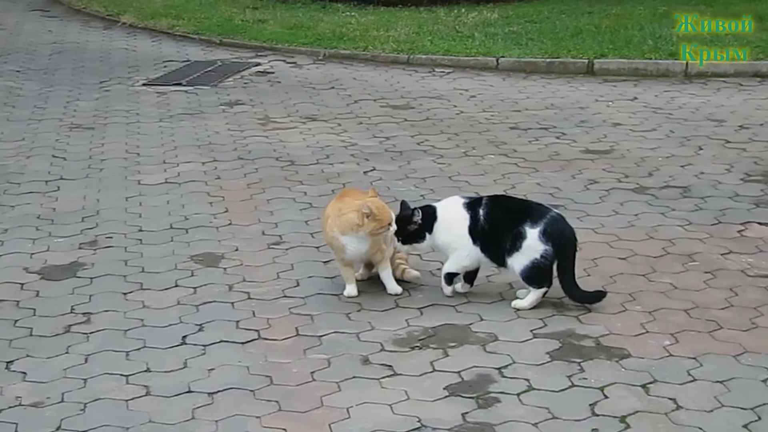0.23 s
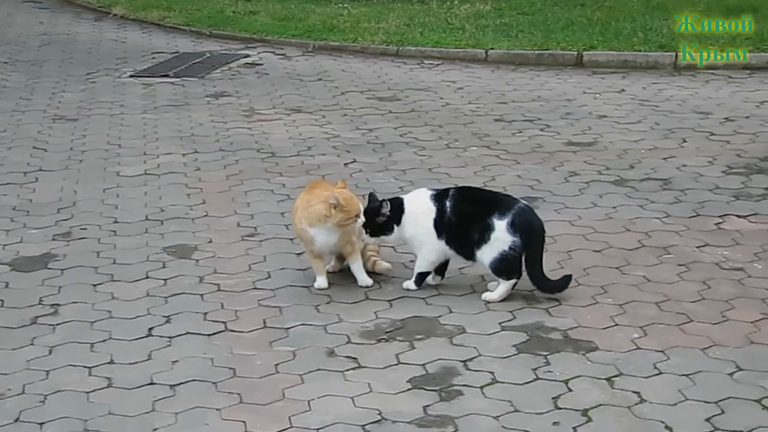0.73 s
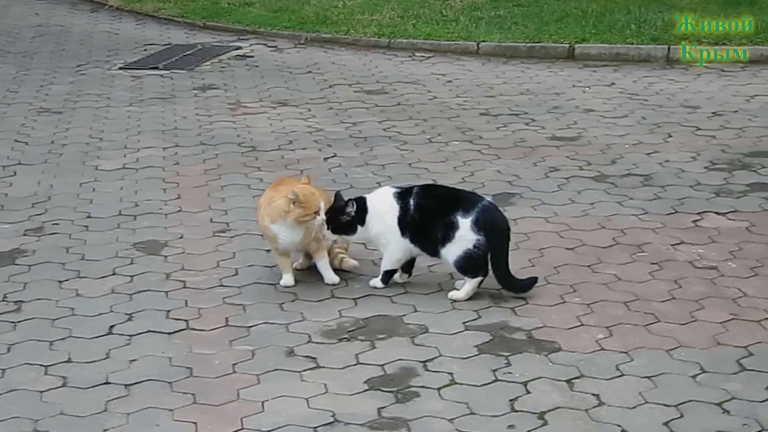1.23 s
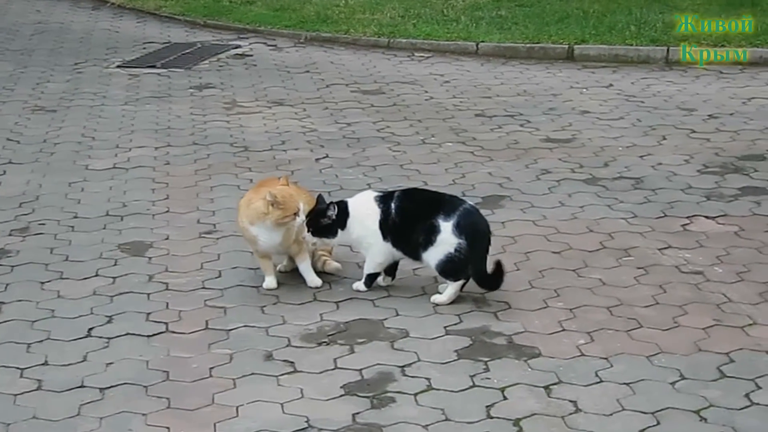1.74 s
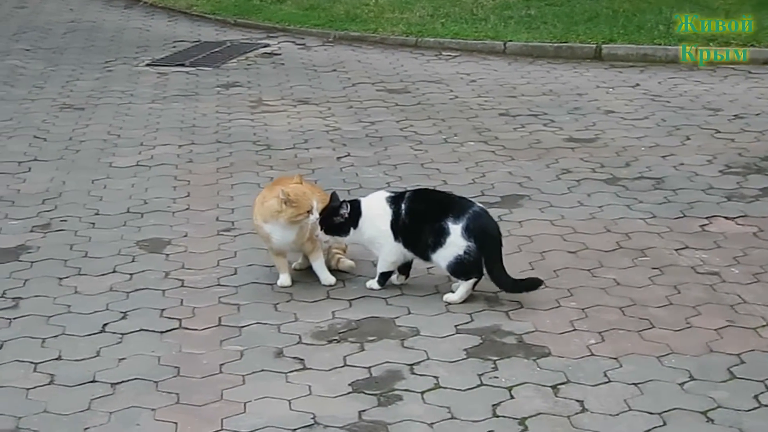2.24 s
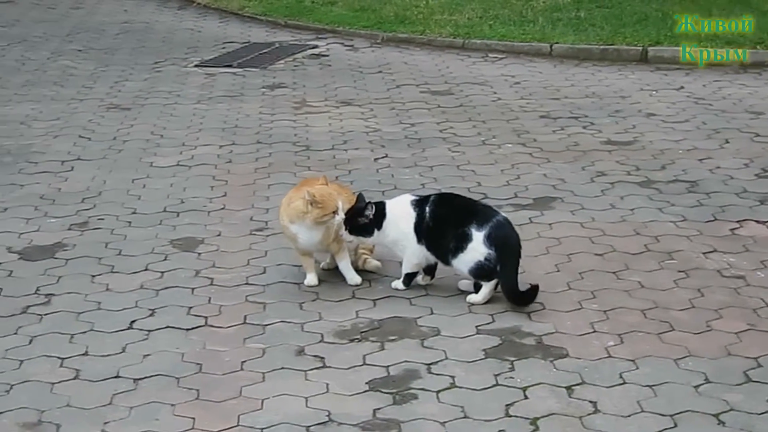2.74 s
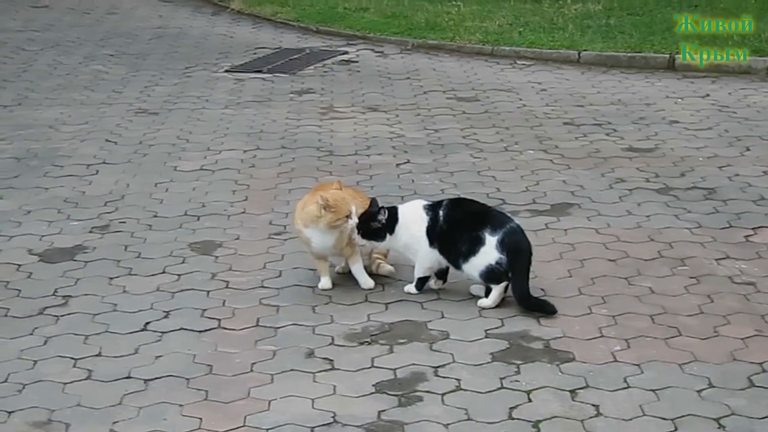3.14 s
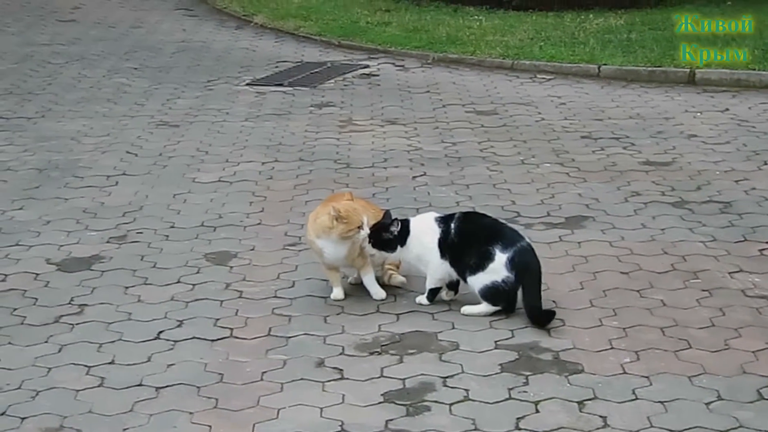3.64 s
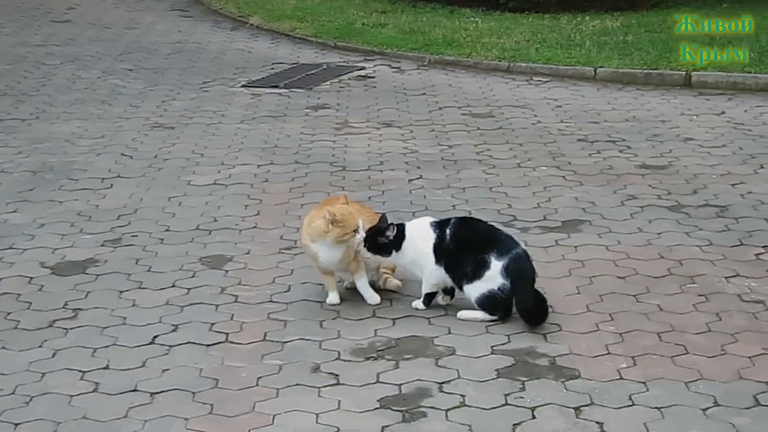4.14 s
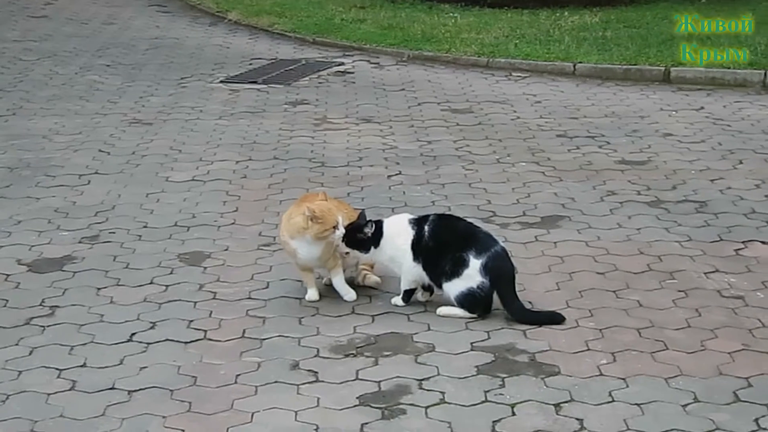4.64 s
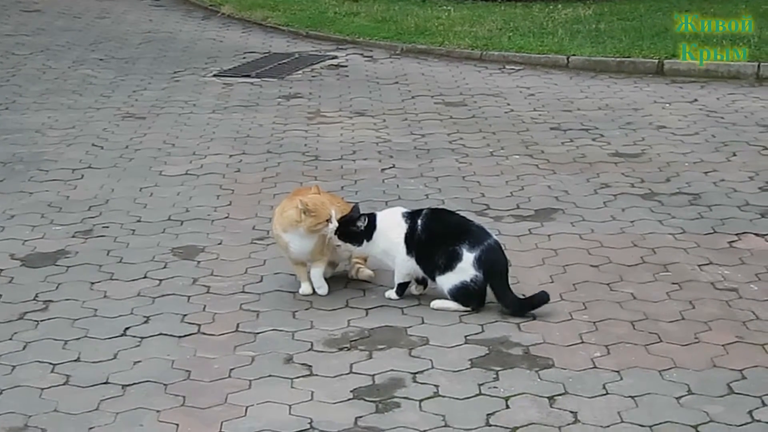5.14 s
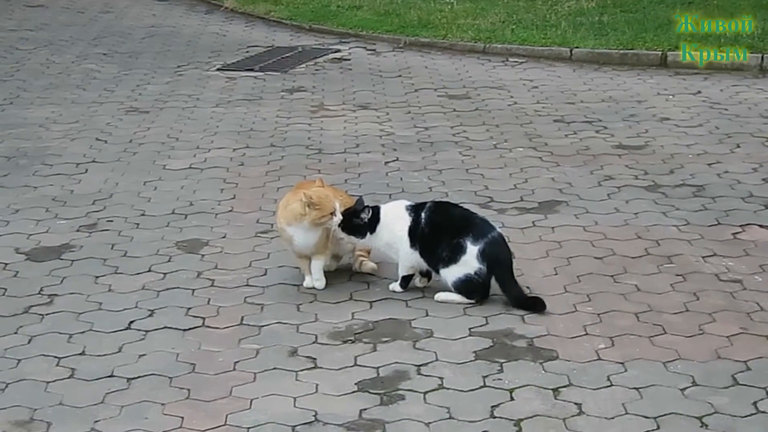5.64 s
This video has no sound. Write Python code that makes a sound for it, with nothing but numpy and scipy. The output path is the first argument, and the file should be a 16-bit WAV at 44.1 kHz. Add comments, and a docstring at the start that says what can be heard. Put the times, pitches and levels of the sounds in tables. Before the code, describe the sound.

A steady outdoor bed of low rumble and soft hiss, wide in stereo, lasts the whole six seconds. From 0 to 1.2 s a cat gives a low, slightly rough closed-mouth moan, a bit right of centre, steady at first and then sinking. At about 1.1 s the other cat starts a long yowl near the centre, with a small sharp tick on the right. It leaps up with a raspy edge, peaks around 1.3 s, throbs gently near 1.9 s, slides down until about 3 s, then grows louder and rises to a brighter, open cry near 3.9 s before stopping at 4.1 s. The tone is nasal, almost whistled. A faint diffuse echo fades in the lull. At 4.65 s a second, hoarser yowl swoops up quietly, strengthens by 5 s, dips, and holds to the end. Four short clicks fall between 5.6 and 5.83 s, the second strongest and leftward.

```python
"""Two cats face each other on a paved yard, over a steady rumble and hiss made of filtered noise.
One moans low with its mouth closed; as it ends, the other starts a long yowl, close to a sharp click.
After a short lull a second yowl rises, with four more clicks near its end. The calls are stacks of harmonics;
the mouth resonance sits near the second one, so the yowls are almost whistles. Clicks are short ringing tones.
Distant walls and trees answer the calls with a faint echo of fading noise."""
import sys
import numpy as np
from scipy import signal
from scipy.io import wavfile

SR = 44100
rng = np.random.default_rng(int(sys.argv[2]) if len(sys.argv) > 2 else 0)


def master(y):
    """Save y as 16-bit WAV."""
    cut = np.clip(np.atleast_2d(y).T, -1, 1)
    pcm = np.round(cut * 32767)  # scale
    wavfile.write(sys.argv[1], SR, pcm.astype(np.int16))


N = 260190

# Outdoor background noise, before its overall level is set: f/Hz, relative level per Hz/dB
AIR_SPECTRUM = [(25, -26), (45, 4), (72, -0.5), (110, 0.5), (190, 1), (350, -5.5), (700, -5.5),
                (1050, -9.5), (1400, -11.5), (2500, -15), (4500, -18.5), (8000, -22.5), (13000, -32),
                (15500, -17)]
# How alike the background is at the two ears: f/Hz, left-right correlation (1 = the same)
EAR_LIKENESS = [(30, 0.71), (70, 0.95), (170, 0.13), (350, 0.057), (700, 0.14), (1500, 0.36), (3000, 0.66),
                (6000, 0.51), (11000, .05)]
# Narrow bands that stand out of the background: f/Hz, width/Hz, level/dB
HUM_BANDS = [(74.2, 13, -45), (1069, 62, -44.5)]
# Clicks: t/s, hollow knock/dB, snap/dB, bright tick/dB, left over right/dB
CLICK_TIMES = [(1.1435, -42, -23, -17.5, -18.5), (5.608, -53, -25, -43, -6), (5.666, -11.5, -3.5, -23, 7.5),
               (5.748, -17.5, -27, -40, 1), (5.829, -19, -44, -32, 0)]
# What the clicks ring with, three modes each for knock, snap and tick: f/Hz, level/dB, time to fall 60 dB/s
RINGING_MODES = [(1096, 7.5, 0.01), (1269, 7, 0.0088), (1880, -10.5, 0.02), (2950, -6.5, 0.011),
                 (3736, -6.5, 0.016), (4450, -6, 0.0039), (7260, 4, 0.0015), (9070, -8.5, 0.0088),
                 (10400, -4, 0.0051)]
# The moan, its mouth kept closed: t/s, pitch/Hz, effort/dB
MOAN_CURVE = [(0, 481.7, -24), (.2, 474, -19.5), (0.459, 484.4, -14.5), (.78, 481.6, -16),
              (0.921, 446.6, -24), (1.09, 400.6, -19), (1.19, 389, -20.5)]
# The two yowls: t/s, pitch/Hz, effort/dB, mouth resonance/Hz
FIRST_YOWL_CURVE = [(1.075, 240, -30, 800), (1.11, 318, -22, 870), (1.15, 426, -9, 990),
                    (1.2, 493, -12, 1110), (1.32, 533, -10, 1250), (1.47, 516, -6, 1190),
                    (1.61, 489, -11, 1020), (1.8, 462, -8.5, 950), (2.04, 453, -8, 915),
                    (2.12, 441, -12, 860), (2.19, 431.5, -9.5, 850), (2.3, 421, -10.5, 865),
                    (2.346, 428, -13, 880), (2.41, 418, -9, 865), (2.56, 420.5, -9, 880),
                    (2.74, 396, -11, 795), (2.91, 374.5, -10.3, 785), (3.05, 374, -6, 821),
                    (3.21, 375.5, -5, 900), (3.47, 401, -5, 912), (3.62, 390.5, -4.5, 859),
                    (3.75, 427, -4, 1047), (3.87, 466, -4.5, 1187), (3.98, 462, -6, 1114),
                    (4.095, 436, -7, 1020)]
SECOND_YOWL_CURVE = [(4.65, 354.5, -44, 1090), (4.71, 435, -22, 1040), (4.77, 530.5, -22, 1230),
                     (4.86, 531, -18, 1285), (4.995, 509.7, -8.5, 1321), (5.01, 539, -10, 1324),
                     (5.12, 492.7, -12.5, 1051), (5.21, 477, -17.5, 1051), (5.31, 474.4, -16.5, 945),
                     (5.52, 463.2, -10.5, 921), (5.8, 473.2, -12, 918), (5.95, 466.4, -9, 910)]
# Throat resonances that shape the upper harmonics: f/Hz, width/Hz, level/dB
FIRST_THROAT_MODES = [(1670, 180, -2), (2084, 143, 0.5), (2340, 41, -6), (6800, 170, -17),
                      (7580, 210, -11.5), (11000, 59, -22), (12200, 200, -20)]
SECOND_THROAT_MODES = [(2030, 250, -9), (2360, 47, 1), (2634, 130, -2.5), (3090, 110, -10),
                       (4230, 280, -21), (6570, 54, -10), (13000, 724, -29)]

AIR_DB = -33   # background level, as rms of the two channels' average
CUTOFF_HZ = 15300   # nothing much is heard above this
YARD_T60_S, ECHO_BUILD_S = 0.69, 0.38   # echo: time to fall 60 dB, length of the rising ramp
ATTACK_S, RELEASE_S = 0.0063, 0.013   # fades of every call
CLOSED_HZ, HALF_OPEN_HZ = 680, 1004   # the mouth resonance rises as the jaw opens
MOUTH_Q, MOUTH_STEEPNESS = 7.65, 0.85   # sharpness of the mouth resonance and steepness of its skirts
PRESSED_AFTER_S, PRESSED_S = 0.2, 0.11   # a moment early in the call when the overtones change level
UNSETTLED_DB = -1   # overtones are weaker until the folds lock
QUAVER_AT_S, QUAVER_SPREAD_S, QUAVER_HZ, QUAVER_DB = 1.893, 0.29, 6.8, 1.5   # throb in the first yowl
MID_PITCH_HZ = 475
LOW_DB_PER_OCTAVE, UPPER_DB_PER_OCTAVE = 14.5, 15   # fundamental and overtones grow with the pitch
SETTLE_S, RASP_PER_OCTAVE = 0.081, 0.3   # early rasp clears, then returns as the mouth passes half open
WAVER_DB, FLICKER_DB = 0.47, 3.5   # unsteadiness of the whole voice and of single high harmonics


def from_db(db):
    """Decibels to gain."""
    return 10 ** (np.asarray(db) / 20)


def rms_one(x):
    """Scale to rms 1."""
    return x / np.sqrt(np.mean(x ** 2) + 1e-20)


def in_time(rows, t):
    """The columns of a curve, joined by straight lines, at the times t."""
    s, *columns = np.transpose(rows)
    return [np.interp(t, s, column) for column in columns]


def at_hz(points, hz):
    """Read a spectrum at hz, on a log-frequency axis."""
    points_hz, values = np.array(points).T
    return np.interp(np.log(hz), np.log(points_hz), values)


def panned(x, pan_db):
    """Place a mono sound by how much louder it is on the left than on the right."""
    return x * from_db([[pan_db / 2], [-pan_db / 2]])


def drift(rate_hz, size):
    """Slow random wandering of rms 1: noise sent twice through a simple low-pass."""
    r = np.exp(-2 * np.pi * rate_hz / SR)
    noise = rng.standard_normal(size + SR)
    slow = signal.lfilter([1], [1, -2 * r, r * r], noise)
    return rms_one(slow[SR:])   # the first second only warms up the filter


def narrow_noise(size, hz, width_hz):
    """Noise in one band around hz, rms 1."""
    edges = [max(hz - width_hz / 2, 15), hz + width_hz / 2]
    band = signal.butter(2, edges, "band", fs=SR, output="sos")
    noise = rng.standard_normal(size + SR)
    return rms_one(signal.sosfilt(band, noise)[SR:])


def air():
    """Far rumble and hiss: half-octave bands of noise, most alike at both ears in the bass."""
    out = 0
    edges = 22 * 2 ** np.arange(0, 9.6, .5)
    white = rng.standard_normal((2, 2, N))
    for k, (low, high) in enumerate(zip(edges, edges[1:])):
        band = signal.butter(2, [low, high], "band", fs=SR, output="sos")
        # neighbouring bands use different noise
        mid, side = signal.sosfilt(band, white[k % 2])
        hz = np.sqrt(low * high)
        alike = np.clip(at_hz(EAR_LIKENESS, hz), -1, 1)
        # the side part has opposite signs at the ears; more of it makes them less alike
        side_gain = np.sqrt((1 - alike) / (1 + alike + 1e-6))
        out = out + from_db(at_hz(AIR_SPECTRUM, hz)) * (mid + side_gain * side * [[1], [-1]])
    return out / np.sqrt(np.mean(out.mean(axis=0) ** 2))


def hum():
    """Narrow bands of noise that stand out of the background, equal at both ears."""
    return sum(from_db(db) * narrow_noise(N, hz, width) for hz, width, db in HUM_BANDS)


def ring(blow, hz, t60):
    """A unit blow sets a fading sine of starting height 1 ringing."""
    r = from_db(-60 / (t60 * SR))   # what is left after each sample
    w = 2 * np.pi * hz / SR
    return signal.lfilter([0, np.sin(w)], [1, -2 * r * np.cos(w), r * r], blow + 1e-18)


def clicks():
    """Each click rings the low, middle and high modes with strengths of its own."""
    out = np.zeros((2, N))
    blow = signal.unit_impulse(SR // 20)
    for s, *strengths_db, pan_db in CLICK_TIMES:
        sound = np.zeros(len(blow))
        for k, (hz, db, t60) in enumerate(RINGING_MODES):
            sign = (-1) ** k
            sound += sign * from_db(db + strengths_db[k // 3]) * ring(blow, hz, t60)
        start = round(s * SR)
        out[:, start:start + len(sound)] += panned(sound, pan_db)[:, :N - start]
    return out


def yard(x, thin_hz, dull_hz):
    """Middle-range scatter from distant walls and trees: it swells, then dies, differently at each ear."""
    t = np.arange(SR) / SR
    shape = np.minimum(t / ECHO_BUILD_S, 1) * from_db(-60 * t / YARD_T60_S)
    tail = rng.standard_normal((2, SR)) * shape / np.sqrt(np.sum(shape ** 2))
    edges = [thin_hz, np.clip(dull_hz, 1.5 * thin_hz, SR / 3)]
    band = signal.butter(2, edges, "band", fs=SR, output="sos")
    return signal.fftconvolve(x[None], signal.sosfilt(band, tail), axes=1)[:, :N]


def quaver():
    """Gain of the slow throb that comes and goes early in the first yowl."""
    t = np.arange(N) / SR - QUAVER_AT_S
    depth_db = QUAVER_DB * np.exp(-(t / QUAVER_SPREAD_S) ** 2)
    return from_db(depth_db * np.cos(2 * np.pi * QUAVER_HZ * t))


def vowel(pitch, effort_db, mouth, throat, fundamental_db, third_db, upper_db, open_db, count=32):
    """Harmonic gains: the mouth favours the second or third; opening it lets the throat's overtones out."""
    high = np.log2(pitch / MID_PITCH_HZ)   # octaves above the middle pitch
    gains = [from_db(fundamental_db + LOW_DB_PER_OCTAVE * high)]
    for k, tilt_db in ((2, 0), (3, third_db)):
        detuning = MOUTH_Q * (k * pitch / mouth - mouth / (k * pitch))
        gains.append(from_db(effort_db + tilt_db) / (1 + detuning ** 2) ** MOUTH_STEEPNESS)
    opening = np.log2(mouth / HALF_OPEN_HZ)
    bright = from_db(upper_db + UPPER_DB_PER_OCTAVE * high + open_db * opening)
    for k in range(4, count):
        resonance = sum(from_db(db) / (1 + (2 * (k * pitch - hz) / width) ** 2) ** 0.59
                        for hz, width, db in throat)
        gains.append(bright * resonance)
    return gains


def cat(call, throat, fundamental_db, third_db, upper_db, open_db, pressed_db,
        held_rasp, onset_rasp, jitter, shimmer, flutter_db, fray, hoarse_db):
    """One call: harmonics of the vocal folds, whose period and strength tremble with the rasp."""
    start, end = call[0][0], call[-1][0]
    span = np.arange(max(0, int(start * SR)), min(N, int(end * SR)))
    t, size = span / SR, len(span)
    pitch, effort_db, mouth = in_time(call, t)

    unsettled = onset_rasp * np.exp(-(t - start) / SETTLE_S)
    wide_open = np.maximum(np.log2(mouth / HALF_OPEN_HZ), 0)
    rasp = np.clip(held_rasp + unsettled + RASP_PER_OCTAVE * wide_open, 0, 1)
    pressed = np.exp(-((t - start - PRESSED_AFTER_S) / PRESSED_S) ** 2)
    overtones_db = upper_db + pressed_db * pressed + UNSETTLED_DB * unsettled
    gains = vowel(pitch, effort_db, mouth, throat, fundamental_db, third_db, overtones_db, open_db)

    pitch = pitch * (1 + 0.00213 * drift(15, size) + jitter * rasp * drift(111, size))
    phase = 2 * np.pi * np.cumsum(pitch) / SR
    voice = np.zeros(size)
    for k, gain in enumerate(gains, 1):
        partial = np.sin(k * phase)
        if k in (3, 4):
            # with rasp the middle harmonics flutter and fray into a grainy band
            flutter = from_db(flutter_db * rasp ** .25 * np.tanh(drift(23, size)))
            partial = flutter * np.sin(k * phase + fray * rasp * drift(60, size))
        elif k > 4:
            # the high harmonics come and go more slowly
            partial = from_db(FLICKER_DB * np.tanh(drift(16, size))) * partial
        voice += np.sqrt(2) * gain * partial   # a gain of 1 means rms 1
    voice *= 1 + shimmer * rasp * drift(87, size)
    voice *= from_db(0.5 * drift(22, size) + WAVER_DB * drift(11, size))
    # while the folds are not firmly locked, turbulence adds a band of breathy noise
    voice += from_db(hoarse_db) * rasp ** 2 * narrow_noise(size, hz=827, width_hz=150)

    fade = np.clip(np.minimum((t - start) / ATTACK_S, (end - t) / RELEASE_S), 0, 1)
    out = np.zeros(N)
    out[span] = voice * fade
    return out


def scene():
    """The open air, the clicks, and the three calls with their faint echo."""
    background = from_db(AIR_DB) * air() + hum()
    closed_moan = [(*row, CLOSED_HZ) for row in MOAN_CURVE]
    moan = cat(closed_moan, FIRST_THROAT_MODES, fundamental_db=-32, third_db=-7.5, upper_db=-51,
               open_db=20, pressed_db=-2, held_rasp=.22, onset_rasp=0, jitter=0.021, shimmer=0.34,
               flutter_db=7, fray=.6, hoarse_db=-45)
    first = cat(FIRST_YOWL_CURVE, FIRST_THROAT_MODES, fundamental_db=-36.5, third_db=-4.0, upper_db=-41.5,
                open_db=17.5, pressed_db=-8, held_rasp=0.057, onset_rasp=.95, jitter=0.024, shimmer=0.11,
                flutter_db=6, fray=1.84, hoarse_db=-44)
    first = quaver() * first
    second = cat(SECOND_YOWL_CURVE, SECOND_THROAT_MODES, fundamental_db=-39, third_db=-4.5, upper_db=-42.5,
                 open_db=0.5, pressed_db=7, held_rasp=0.15, onset_rasp=1.39, jitter=0.0235, shimmer=0.15,
                 flutter_db=7.0, fray=1.0, hoarse_db=-38.5)
    echo = from_db(-8) * yard(moan + first + second, thin_hz=1125, dull_hz=2730)
    cats = panned(moan, pan_db=-3.8) + panned(first, pan_db=-0.9) + panned(second, pan_db=-1.1)
    return background + clicks() + echo + cats


def record(dry):
    """Peaks stop at full scale, then a steep low-pass cuts the top."""
    low_pass = signal.ellip(10, .1, 80, CUTOFF_HZ, fs=SR, output="sos")
    return signal.sosfilt(low_pass, np.clip(dry, -1, 1))


dry = scene()
out = record(dry)
master(out)
```